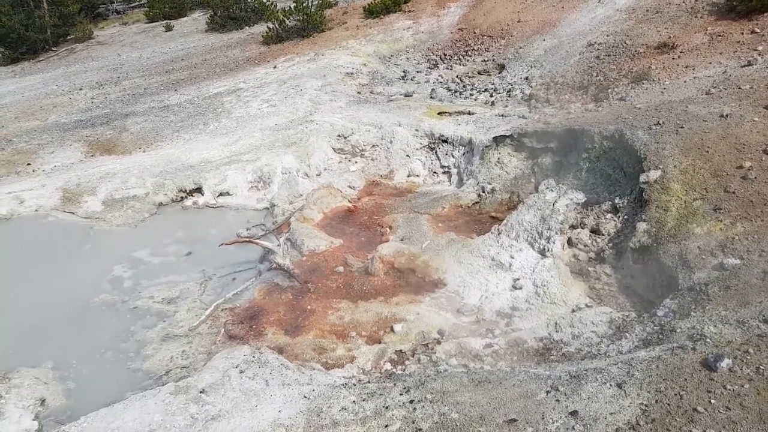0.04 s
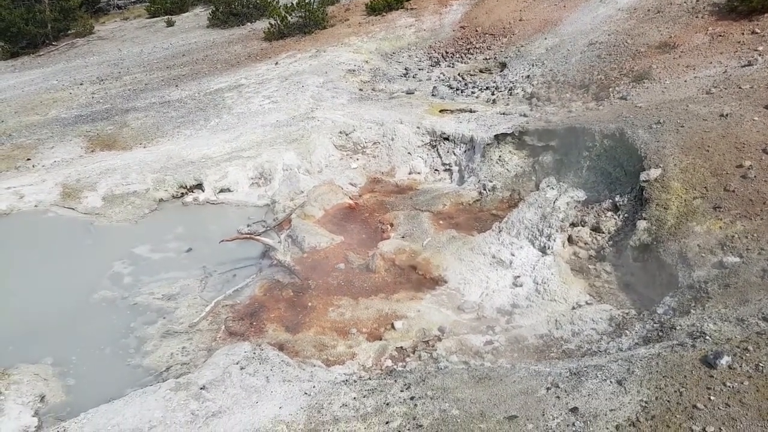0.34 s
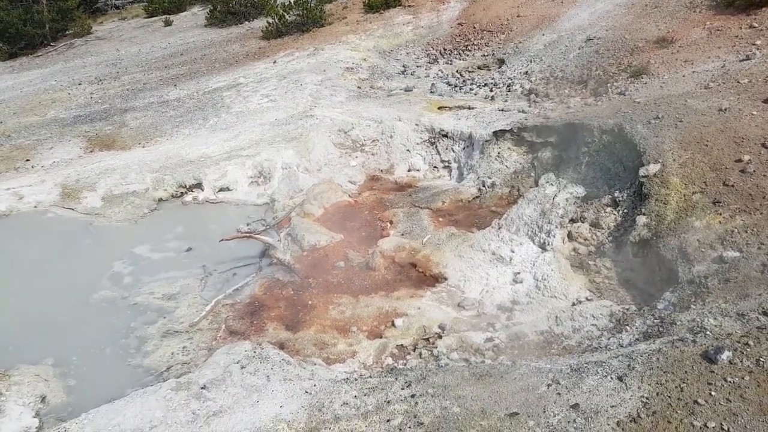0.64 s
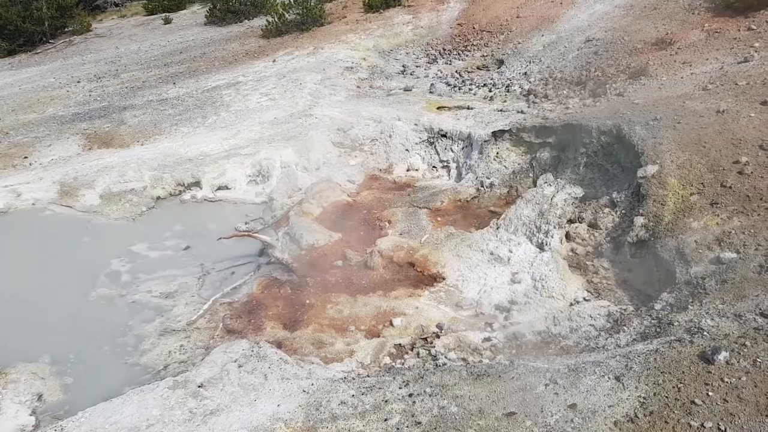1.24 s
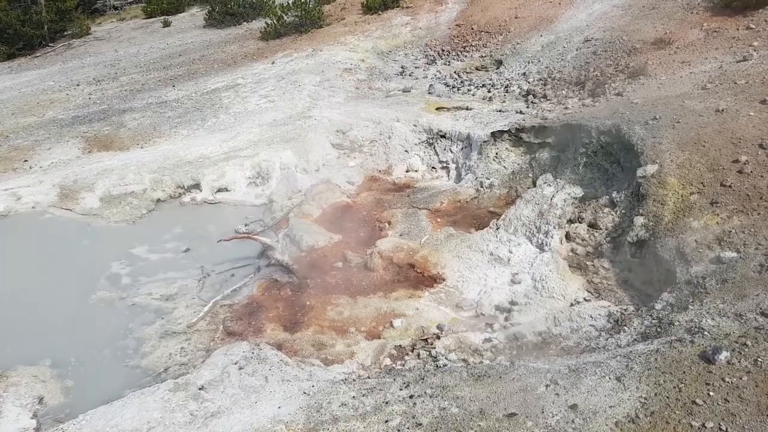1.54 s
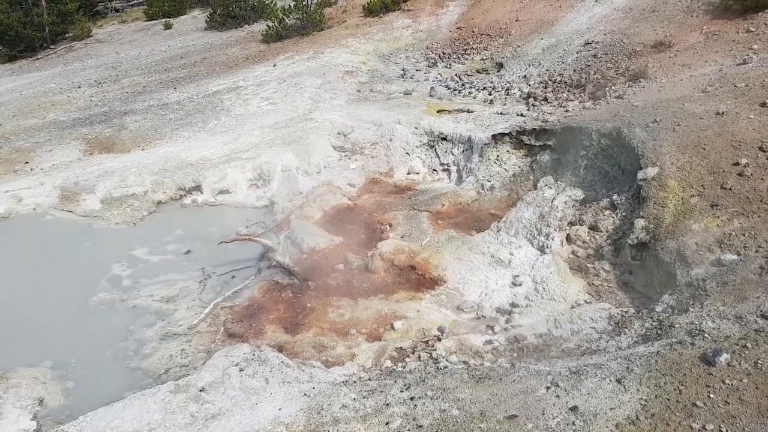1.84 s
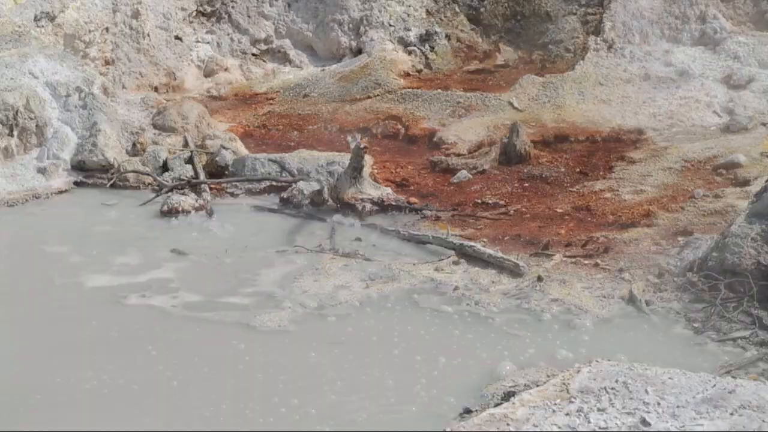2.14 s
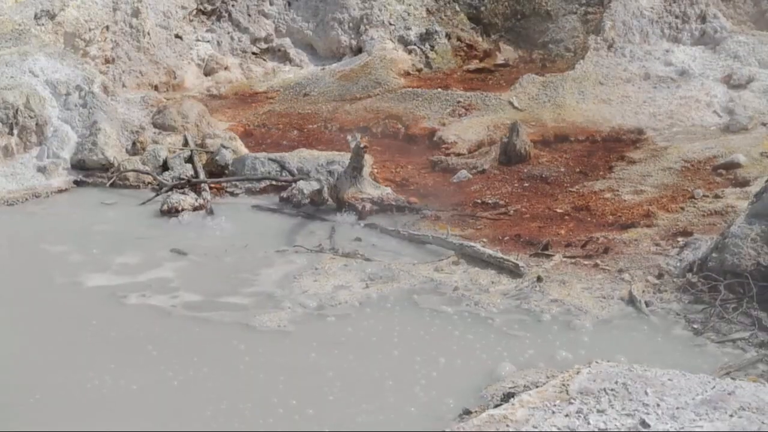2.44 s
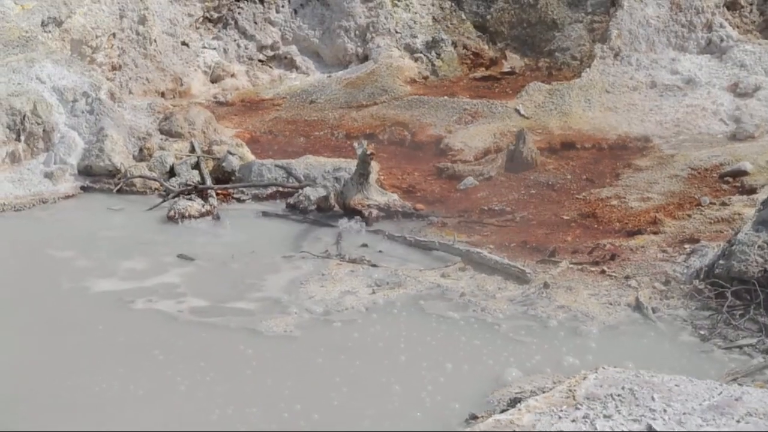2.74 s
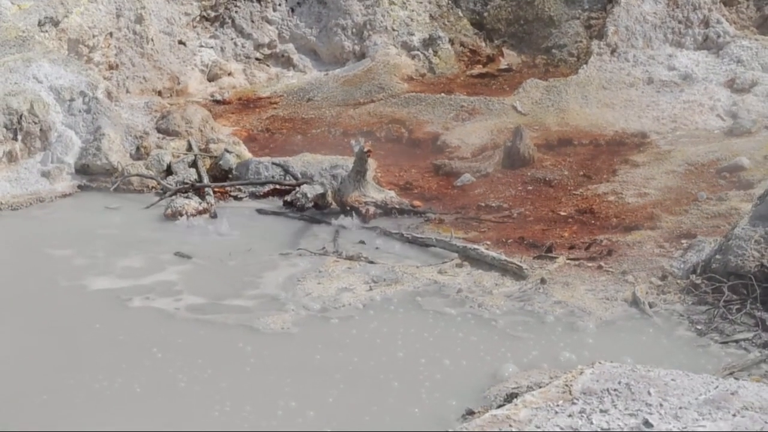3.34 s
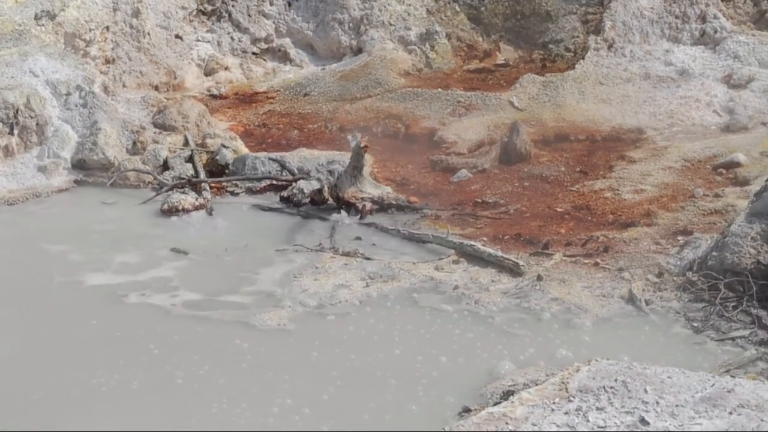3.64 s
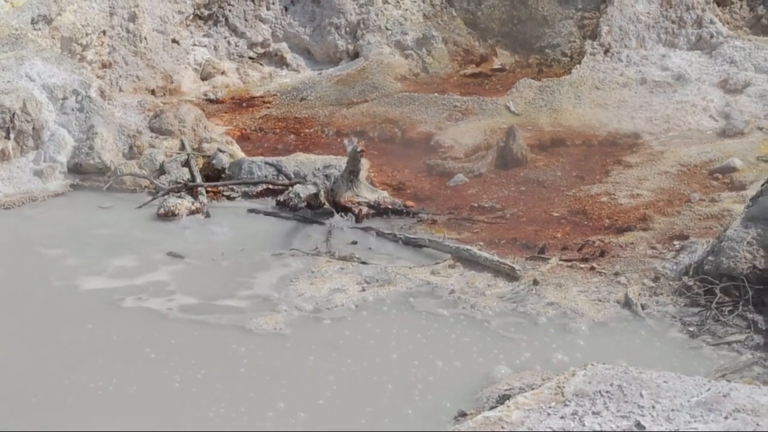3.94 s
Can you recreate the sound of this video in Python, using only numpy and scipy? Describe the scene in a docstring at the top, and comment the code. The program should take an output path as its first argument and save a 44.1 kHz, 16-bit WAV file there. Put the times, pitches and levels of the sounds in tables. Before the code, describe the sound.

Boiling water bubbles in a steaming pool, heard from afar and then sloshing nearby.

```python
"""A hot spring in a rocky hollow, outdoors. From a distance, on a stereo microphone: the vent rumbles,
countless small bubbles ring in the churning water, steam hisses, and now and then a big bubble bursts
with a bump, sheds spray and splashes back. After a short silent cut the spring fades in from close by,
louder, in mono and without its top treble: sloshing water, fizz and more big bubbles."""
import sys
import numpy as np
from scipy import signal
from scipy.fft import rfft, irfft, next_fast_len
from scipy.io import wavfile
from scipy.ndimage import uniform_filter1d, map_coordinates

SR = 44100
rng = np.random.default_rng(int(sys.argv[2]) if len(sys.argv) > 2 else 0)


def inscribe(sig):
    """Save sig as 16-bit PCM at rate SR to the path in sys.argv[1].

    A 1-D sig is mono; a 2-D sig holds one channel per row.
    Samples are clipped to [-1, 1] before scaling.
    """
    pcm = np.round(np.clip(np.atleast_2d(sig).T, -1, 1) * 32767)
    wavfile.write(sys.argv[1], SR, pcm.astype(np.int16))


N = 176400


def amp(db):
    """Decibels to gain."""
    return 10 ** (np.asarray(db) / 20)


def unit(x):
    """Scale to rms 1."""
    return x / np.sqrt(np.mean(x ** 2) + 1e-20)


def along(points, hz):
    """Read (f/Hz, value) points on a log frequency axis."""
    f, values = np.transpose(points)
    return np.interp(np.log(hz + 1), np.log(f + 1), values)


def curve(points):
    """Read (t/s, value) points at every sample."""
    return np.interp(np.arange(N) / SR, *np.transpose(points))


def wobble(rate):
    """A smooth random curve, rate knots a second."""
    return map_coordinates(rng.standard_normal(2048), [np.arange(N) * rate / SR + 2], mode="wrap")


def filtered(x, response):
    """Filter x by a gain that depends on frequency."""
    size = next_fast_len(N + SR // 2)
    return irfft(rfft(x, size) * response(np.fft.rfftfreq(size, 1 / SR)), size)[..., :N]


def coloured(x, spectrum):
    """Shape x by (f/Hz, level/dB) points, at rms 1."""
    return unit(filtered(x, lambda hz: amp(along(spectrum, hz))))


# How alike left and right are at the distant microphone: f/Hz, correlation
STEREO_LIKENESS = [(60, 0.9), (99, 0.99), (160, 0.99), (270, 0.95), (450, 0.82), (740, 0.72), (1220, 0.38),
                   (2010, 0.38), (3330, 0.3), (5500, 0.045), (9080, -0.03), (15000, -0.02)]
def spread(pair, spectrum):
    """Two unrelated signals become a coloured stereo pair: near mono in the bass, wide in the treble."""
    mid, side = coloured(np.array(pair), spectrum)
    side = filtered(side, lambda hz: np.tan(np.arccos(along(STEREO_LIKENESS, hz)) / 2))
    return np.array([mid + side, mid - side])


def rock_echoes(x, echo_db=-25, longest_s=.03):
    """Add eight weak, early echoes off the walls of the hollow."""
    delay = longest_s * rng.uniform(.1, 1, size=8)
    taps = np.bincount(np.round(delay * SR).astype(int), amp(echo_db) * rng.choice([-1, 1], size=8))
    taps[0] = 1
    return signal.fftconvolve(x, taps / np.linalg.norm(taps))[:N]


# Spectrum of the distant vent: f/Hz, relative level/dB
VENT_SPECTRUM = [(22, -17), (45, -18), (65, -9.5), (110, -3), (165, 1), (215, -4.5), (300, -4.5),
                 (400, -25.5), (660, -84)]
# Rise and fall of its rumble: t/s, relative level/dB
VENT_LEVEL = [(0, -56), (.16, -62), (.34, -56.5), (.55, -49.5), (.78, -48), (1.25, -47), (1.65, -48.5),
              (1.9, -49.5), (2.03, -46), (2.17, -54)]
def vent_rumble():
    """The vent from afar: low noise that swells and wavers."""
    level_db = curve(VENT_LEVEL) - 0.5 + 0.72 * wobble(12)
    return amp(level_db) * spread(rng.standard_normal((2, N)), VENT_SPECTRUM)


def rush(patchy_db):
    """The rush of water or steam: white noise with patches of random gain in time and frequency."""
    spectrogram = signal.stft(rng.standard_normal(N), nperseg=512)[2]
    patches = uniform_filter1d(rng.standard_normal(spectrogram.shape), 6, axis=0)
    patches = unit(uniform_filter1d(patches, 9, axis=1))
    return unit(signal.istft(spectrogram * amp(patchy_db * patches), nperseg=512)[1][:N])


def bubbles(start, hz, gain, life_cycles, swell_cycles=.54, glide=.011, size=1200):
    """Ringing bubbles: each swells and dies away, its pitch rising by the fraction glide per life."""
    k = np.arange(size)
    turns = hz[:, None] * k / SR
    age = turns / life_cycles
    envelope = np.exp(-age) * (1 - np.exp(-turns / swell_cycles)) * (1 - (k / size) ** 2)
    ring = np.sin(2 * np.pi * turns * (1 + glide * age / 2)) * envelope
    where = np.round(start * SR).astype(int)[:, None] + k
    return np.bincount(where.ravel(), (gain[:, None] * ring).ravel(), N)[:N]


def froth(low_hz, high_hz, life_cycles, scatter_db, count):
    """Countless bubbles of random size and moment, with an even spectrum."""
    when, pitch, loud = rng.random((count, 3)).T
    hz = low_hz * (high_hz / low_hz) ** pitch
    gain = hz * amp(scatter_db * np.minimum(-np.log(1 - loud), np.pi))
    return unit(bubbles(when * N / SR, hz, gain, life_cycles, swell_cycles=.4, glide=.05, size=600))


# Spectrum of the boiling pool at a distance: f/Hz, relative level/dB
FAR_WATER_SPECTRUM = [(160, -30), (280, -8), (350, 1.5), (430, -1.5), (540, -4), (700, -5), (920, -7),
                      (1250, -8.5), (1600, -10), (1850, -10), (2030, -9), (2450, -19), (2700, -19.5),
                      (3500, -59), (5900, -100)]
def far_water(level_db=-43.5):
    """The pool from afar: churning water with small bubbles ringing in it."""
    pair = []
    for _ in range(2):
        churn = rush(patchy_db=.2)
        ringing = froth(low_hz=284, high_hz=2816, life_cycles=2.5, scatter_db=2.5, count=2200)
        pair.append(rock_echoes(churn + amp(-11.5) * ringing))
    return amp(level_db + 1.2 * wobble(3) + .13 * wobble(27.2)) * spread(pair, FAR_WATER_SPECTRUM)


# Spectrum of the distant steam: f/Hz, relative level/dB
STEAM_SPECTRUM = [(1470, -35), (2500, -7), (2800, -1), (3030, 2), (3500, 1.5), (3700, -0.5), (4000, 1),
                  (4450, -4.5), (5100, -7), (5650, -3.5), (6200, -10.5), (7000, -8.5), (7800, -7),
                  (9400, -12), (11300, -9.5), (12600, -12.5), (14600, -18), (15500, -18.5)]
# Slow drift of its hiss: t/s, level/dB
STEAM_DRIFT = [(0.0, -54.5), (0.53, -54.5), (0.97, -52), (1.33, -53.5), (1.51, -52.5), (2.14, -54.5)]
def steam_hiss():
    """Steam from afar: a smooth hiss, wide in the stereo image."""
    level_db = curve(STEAM_DRIFT) + .15 * wobble(17)
    pair = [rock_echoes(rush(patchy_db=1.3)) for _ in range(2)]
    return amp(level_db) * spread(pair, STEAM_SPECTRUM)


# Big bubbles in the pool: t/s, relative level/dB, f/Hz, life/cycles, splash offset/dB
BURSTS = [(0.585, -27.5, 675, 2.8, -16), (0.592, -27, 604, 1.8, -19), (0.599, -24.5, 450, 1.7, -15),
          (0.604, -24, 380, 2.1, -26), (1.019, -25, 440, 1.8, -24), (1.167, -26.5, 480, 1.54, -22),
          (1.331, -25, 843, 2.8, -16), (1.335, -21, 230, 0.88, -18), (1.342, -25, 468, 2.5, -21),
          (1.395, -33.5, 1010, 2.2, -8.5), (1.42, -34, 603, 1.7, -14.5), (1.555, -23.5, 570, 2.2, -17),
          (1.567, -31, 380, 2.2, -19), (1.706, -33, 1060, 2.2, -7), (2.589, -20.5, 656, 1.7, -13.5),
          (2.621, -22, 726, 2.5, -23), (2.636, -18, 900, 1.5, -6.5), (2.640, -12.5, 738, 2.7, -21.5),
          (2.654, -20.5, 696, 2.7, -15), (2.661, -23.5, 738, 4.8, -13.5), (2.719, -28.5, 340, 1.4, -26),
          (2.965, -24, 950, 2.4, -12.5), (3.17, -23.5, 880, 2.6, -9), (3.412, -20.5, 450, 1.4, -11.5),
          (3.424, -21, 600, 1.2, -15), (3.432, -27, 850, 1.6, -19), (3.528, -27.5, 1090, 1.5, -15),
          (3.595, -23.5, 840, 1.7, -15)]
# Spectrum of the water falling back: f/Hz, relative level/dB
SPLASH_SPECTRUM = [(60, -35.5), (160, -8.5), (420, -5), (750, -1.5), (1100, -7.5), (2000, -10.5),
                   (3200, -37.5), (8000, -53)]
def big_bubbles(spray_db=-14.5, spray_delay_s=.0073, splash_rise_s=.0023, splash_fall_s=.025):
    """Each big bubble rings briefly, sheds eight smaller ones and splashes back."""
    starts, db, hz, cycles, splash_db = np.transpose(BURSTS)
    rings = bubbles(starts, hz, amp(db + 3), cycles[:, None], size=2400)
    for start, level, pitch in zip(starts, db, hz):
        delay = spray_delay_s * rng.exponential(size=8)
        spray_hz = pitch * np.exp(.3 * rng.standard_normal(size=8))
        rings += bubbles(start + delay, spray_hz, np.full(8, amp(level + spray_db)), life_cycles=.9)
    age = np.maximum(np.arange(N) / SR - starts[:, None], 0)
    envelopes = (1 - np.exp(-age / splash_rise_s)) * np.exp(-age / splash_fall_s)
    splash_gain = np.linalg.norm(amp(db + splash_db)[:, None] * envelopes, axis=0)  # powers add
    return rings + splash_gain * coloured(rng.standard_normal(N), SPLASH_SPECTRUM)


# Balance at the distant microphone: f/Hz, left minus right level/dB
STEREO_BALANCE = [(60, 1), (380, 0), (700, -0.5), (1300, -3.5), (2400, -5.5), (3200, -0.5), (4500, -5.5),
                  (5700, 1.5), (7400, -2), (9400, 6), (11200, 7.5), (13000, 4), (15500, -5.5)]
def far_balance(hz):
    """Left and right gains: each frequency leans to one side at constant power."""
    gains = amp(np.outer([1, -1], along(STEREO_BALANCE, hz)) / 2)
    return gains / np.sqrt(np.mean(gains ** 2, axis=0))


# Spectrum of the boiling pool close by: f/Hz, relative level/dB
NEAR_WATER_SPECTRUM = [(22, -23.5), (45, -16.5), (85, -11), (130, -4.5), (180, -2), (260, -2.5), (330, -4),
                       (550, 0.5), (740, -6.5), (950, -2), (1200, -5.5), (1550, -4), (1900, -14.5),
                       (2500, -44), (4200, -94)]
def near_water(surge_db, level_db=-36.5):
    """Water sloshes and bubbles near the microphone, with a flutter of its own on top of the surge."""
    slosh = rush(patchy_db=.6)
    ringing = froth(low_hz=199, high_hz=2003, life_cycles=1.66, scatter_db=2, count=3600)
    water = coloured(slosh + amp(-10) * ringing, NEAR_WATER_SPECTRUM)
    return amp(level_db + surge_db + .6 * wobble(25)) * water


# Spectrum of the fizz close by: f/Hz, relative level/dB
FIZZ_SPECTRUM = [(1000, -26.5), (1750, -1.5), (2400, -1.5), (3400, -4.5), (4200, -8), (4900, -16),
                 (5300, -24.5), (5600, -21.5)]
def near_fizz(surge_db, level_db=-39.5):
    """Tiny bubbles ring high near the microphone and surge with the water."""
    hiss = rush(patchy_db=.3)
    ringing = froth(low_hz=1604, high_hz=5470, life_cycles=3.4, scatter_db=2.5, count=3500)
    return amp(level_db + .99 * surge_db) * coloured(hiss + amp(-11.5) * ringing, FIZZ_SPECTRUM)


# Fader of the close microphone: t/s, level/dB
NEAR_FADE = [(2.32, -45), (2.369, -43.5), (2.373, -25), (2.425, -23.5), (2.45, -12), (2.475, -4.5),
             (2.51, -1.5)]
def scene(cut_s=2.173, near_top_hz=5450):
    """The distant position in stereo, a silent cut, then the close position in dull mono."""
    t = np.arange(N) / SR
    bursts = big_bubbles()
    far = far_water() + vent_rumble() + steam_hiss()
    far += np.array([rock_echoes(bursts), rock_echoes(bursts)])
    far = filtered(far, far_balance) * (t < cut_s)
    surge_db = .19 * wobble(6.72) + .59 * wobble(35)
    near = rock_echoes(near_water(surge_db) + near_fizz(surge_db)) + bursts
    near *= amp(curve(NEAR_FADE)) * (t > NEAR_FADE[0][0])
    return far + filtered(near, lambda hz: np.clip((near_top_hz - hz) / 250, 0, 1))


def record(dry, top_hz=15700):
    """The microphone chain passes nothing above its band limit."""
    return filtered(dry, lambda hz: hz < top_hz)


dry = scene()
out = record(dry)
inscribe(out)
```